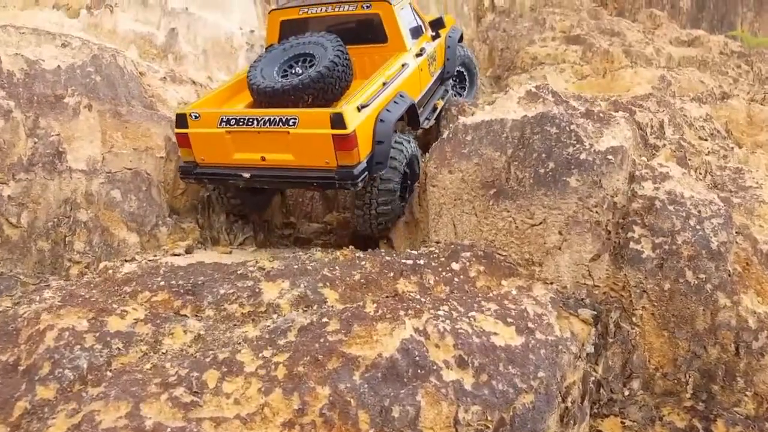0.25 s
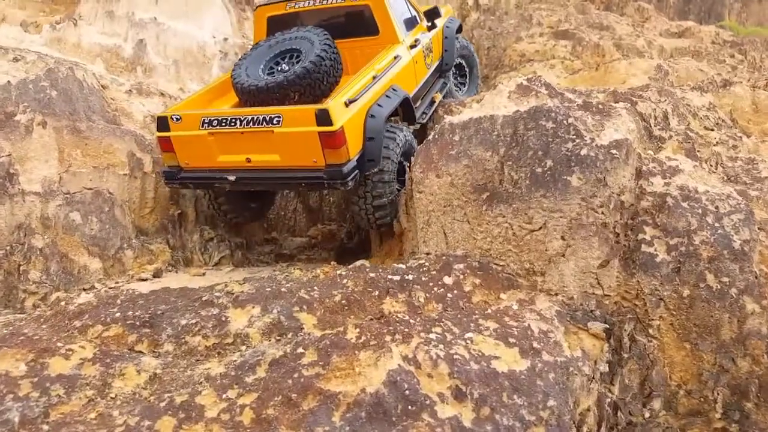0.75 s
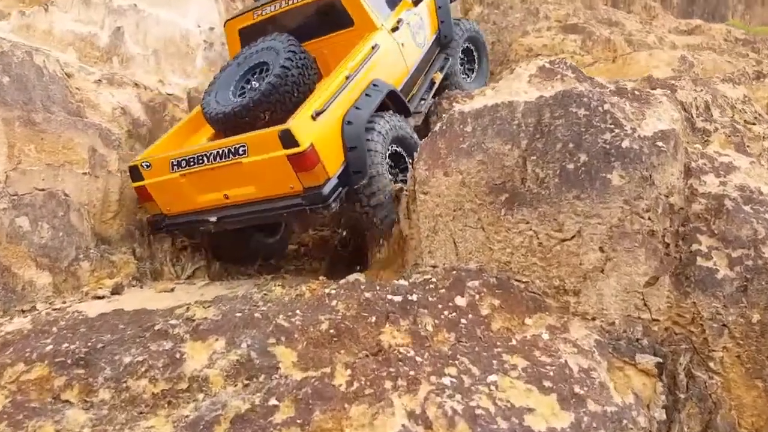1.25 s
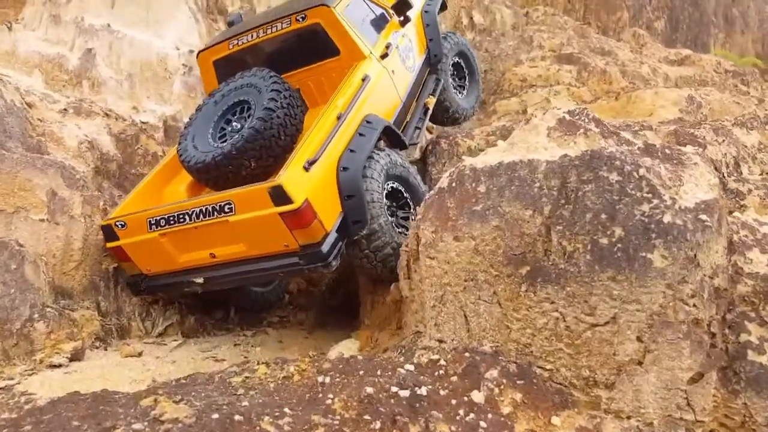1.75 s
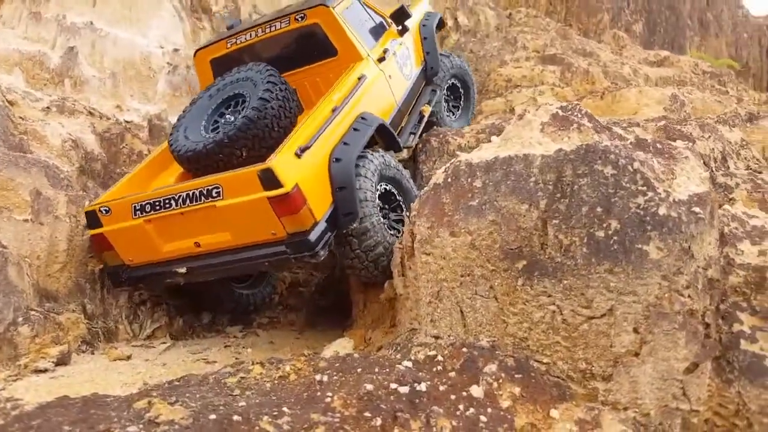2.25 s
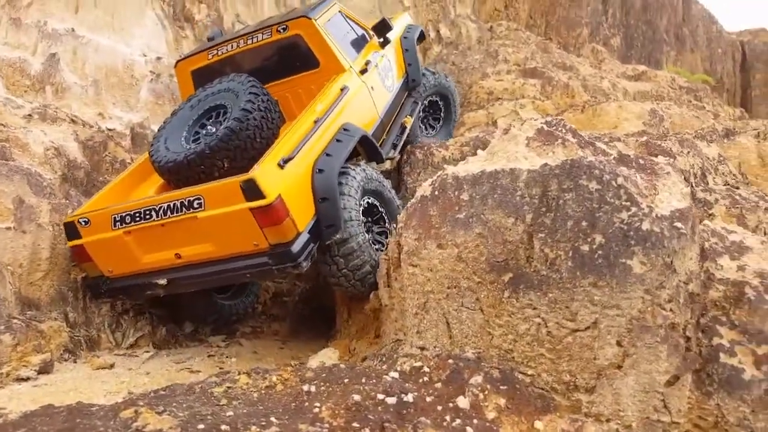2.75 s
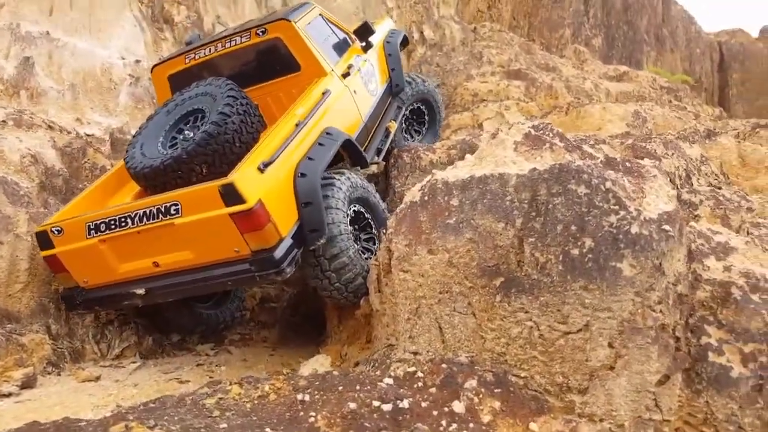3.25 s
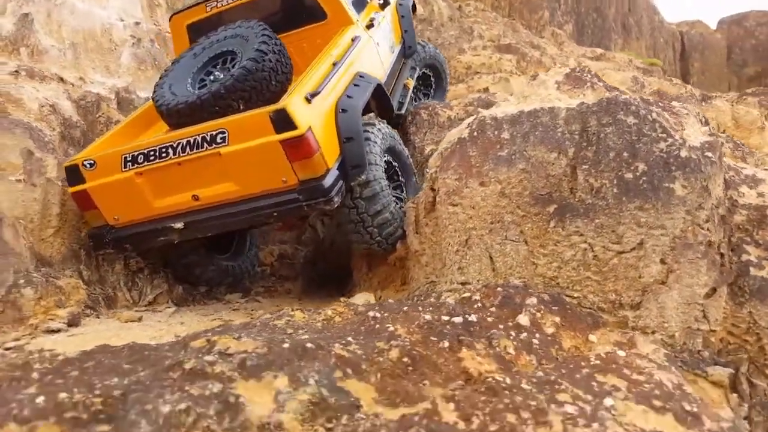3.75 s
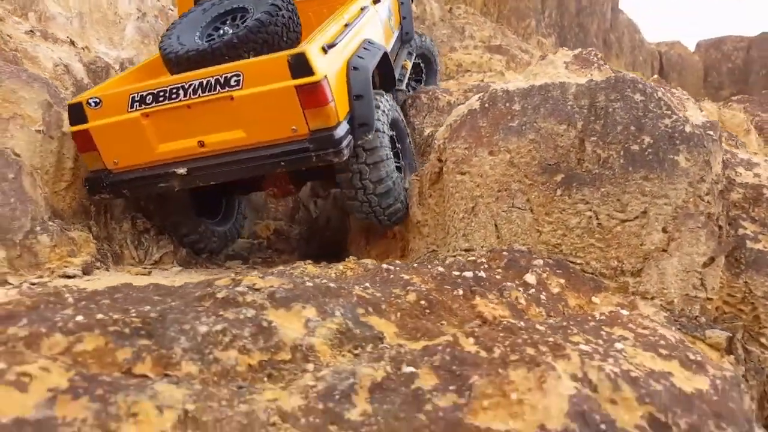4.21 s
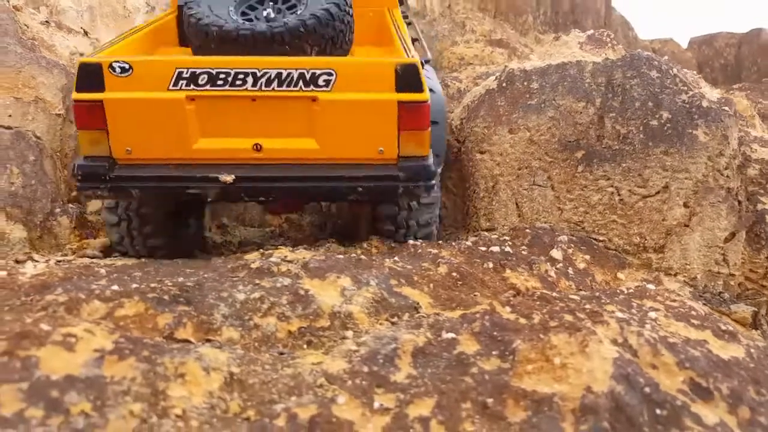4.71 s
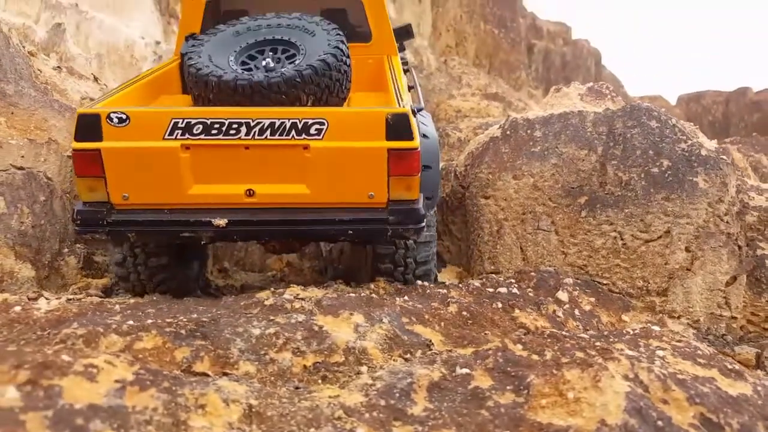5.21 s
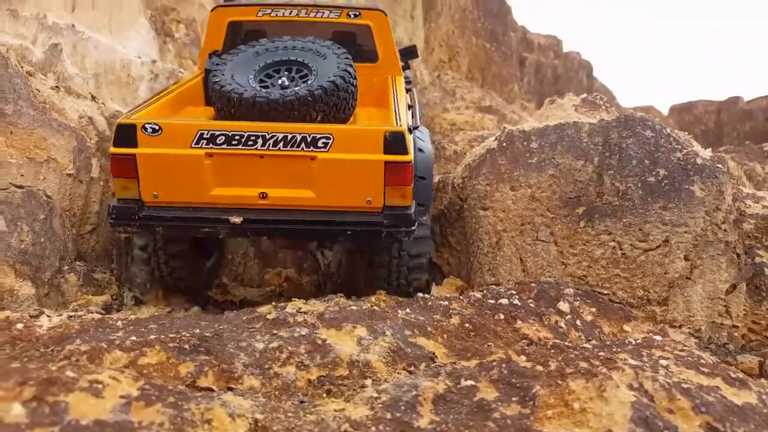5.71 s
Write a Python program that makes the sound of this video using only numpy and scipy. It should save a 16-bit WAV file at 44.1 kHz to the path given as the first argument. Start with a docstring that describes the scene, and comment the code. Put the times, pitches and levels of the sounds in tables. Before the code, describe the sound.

A toy-scale electric crawler grinds and clatters in uneven throttle bursts on rock, with faint high whistle, grit crackle and low outdoor rumble.

```python
"""Hard, gritty bursts of rattle: a small electric model truck claws at a rock step close to two microphones.
Gear teeth and tyre lugs knock on plastic chassis, gearbox and hollow shell, heard as noisy taps through
resonances; the speed controller whistles in the windings as a tone with side tones at the shaft rate.
Swarms of grains hiss and snap under the tyres, a lug squeaks in overtones, the servo buzzes in harmonics.
Further off, a wavering engine tone hums over the open-air rumble; the rock face answers in short noise."""
import sys
import numpy as np
from scipy import signal
from scipy.fft import rfft, irfft, next_fast_len
from scipy.io import wavfile
from scipy.ndimage import uniform_filter1d, map_coordinates

SR = 44100
rng = np.random.default_rng(int(sys.argv[2]) if len(sys.argv) > 2 else 0)


def store_pcm(level_fs):
    """Save levels as 16-bit WAV."""
    pcm = np.round(np.clip(level_fs, -1, 1) * 32767).astype(np.int16)
    wavfile.write(sys.argv[1], SR, np.atleast_2d(pcm).T)


N = 263277

# resonances of the hollow body shell: (centre [Hz], width [Hz], relative level [dB])
SHELL = [(176.5, 39, -11), (301.3, 30.6, 4), (435.3, 93, 0)]
# resonances of the plastic chassis: (centre [Hz], width [Hz], relative level [dB])
CHASSIS = [(646, 53, -7), (776.5, 60, -2.5), (857.7, 51.4, 3.5), (1098.5, 83, -2.5), (1292, 78, -3),
           (1445, 108, -9)]
# resonances of the gearbox: (centre [Hz], width [Hz], relative level [dB])
GEARBOX = [(1642, 109, 3), (1999, 138, 3), (2202, 133, 1), (2485, 260, -1.5), (2713, 285, -1.5),
           (3280, 930, -9.5), (4070, 1630, -13)]
REFERENCE_LOAD_DB = -32  # a hard pull; other settings are stated at this load


def amp(db):
    """Decibels to amplitude."""
    return 10 ** (np.asarray(db) / 20)


def unit(x):
    """x scaled to an rms of one."""
    return x / np.sqrt(np.mean(x ** 2) + 1e-20)


def along(points, hz):
    """Value at hz between (frequency [Hz], value) points on a log axis."""
    f, v = np.transpose(points)
    return np.interp(np.log(hz + 1), np.log(f + 1), v)


def curves(rows):
    """One value per sample for each column after the time."""
    s, *cols = np.transpose(rows)
    return [np.interp(np.arange(N) / SR, s, c) for c in cols]


def wobble(rate):
    """A smooth random curve, rate knots a second."""
    knots = rng.standard_normal(int(N * rate / SR) + 4)
    return map_coordinates(knots, [np.arange(N) * rate / SR])


def filtered(x, response):
    """x times a complex response of frequency."""
    m = next_fast_len(N + SR // 2)
    return irfft(rfft(x, m) * response(np.fft.rfftfreq(m, 1 / SR)), m)[..., :N]


def ring(x, modes):
    """x through a sum of resonances of alternating sign."""
    def response(f):
        total = 0
        for k, (centre, width, db) in enumerate(modes):
            mode = 1j * f * width / (centre * centre - f * f + 1j * f * width)
            total = total + (-1) ** k * amp(db) * mode
        return total
    return filtered(x, response)


def taps(per_s, spread_db):
    """Random impulses of uneven but bounded size."""
    struck = rng.random(N) < per_s / SR
    sign = rng.choice([-1, 1], N)
    return struck * sign * amp(spread_db * np.minimum(rng.exponential(size=N), 3))


def panned(x, db):
    """Left and right channels that differ by db, fixed or per sample."""
    return x * amp(np.array([db / 2, -db / 2]).reshape(2, -1))


def lagged(pair, s):
    """The right microphone hears s seconds later than the left."""
    return filtered(pair, lambda hz: np.exp(1j * np.pi * hz * s * np.array([[1], [-1]])))


def spans(rows, rise_db_per_s, fall_db_per_s, floor_db):
    """Level of the loudest row at each sample, ramps included, then that row's other columns."""
    t = np.arange(0, N / SR, 1 / 1000)
    start, end, open_db, close_db, *cols = np.transpose(rows)[..., None]
    held_db = open_db + (close_db - open_db) * np.clip((t - start) / (end - start), 0, 1)
    before, after = np.maximum(start - t, 0), np.maximum(t - end, 0)
    db = held_db - rise_db_per_s * before - fall_db_per_s * after
    lead = db.argmax(axis=0)
    level_db = np.maximum(db.max(axis=0), floor_db)
    return curves(np.transpose([t, level_db, *[c[lead, 0] for c in cols]]))


def throttle():
    """Drivetrain load and the shares of shell and gearbox, in dB; it grabs fast and coasts down slower."""
    # throttle bursts: (start [s], end [s], opening load [dB], closing load [dB],
    # shell share [dB], gearbox share at the reference load [dB])
    bursts = [(0, .06, -45, -54.5, 2.5, -6.5), (.085, .11, -56, -68, 3.5, 3),
              (.225, .3, -56.5, -53.5, -4, -4.5), (.33, .39, -50, -57.5, 0, -24.5),
              (.65, .69, -47, -42, -1.5, -13.5), (.69, .88, -39, -37, -5.5, -10.5),
              (.88, 1.085, -43, -45, -2, -10.5), (1.11, 1.125, -41, -50, -6, -11),
              (1.147, 1.235, -48, -38, -2, -9.5), (1.265, 1.38, -40, -43, -1.5, -11.5),
              (1.395, 1.6, -37, -32, -4, -9), (1.62, 1.65, -41, -46.5, 2, -10),
              (1.685, 1.745, -44, -42, 0.5, -13.5), (1.795, 1.88, -45, -47, -1, -12.5),
              (1.905, 2.1, -39, -36.5, -4.5, -12.5), (2.11, 2.14, -44.5, -43, -2, -14),
              (2.2, 2.35, -50, -62.5, 3, -8.5), (2.385, 2.41, -46, -47, -2, -10),
              (2.487, 2.6, -44.5, -45.5, -2.5, -8.5), (2.62, 2.77, -59, -58.5, -2.5, -4.5),
              (2.82, 3.23, -40.5, -41.5, -2, -11), (3.26, 3.285, -47.5, -55, -3.5, -16.5),
              (3.32, 3.34, -49, -56, -2.5, -14), (3.39, 3.44, -46.5, -48, -3.5, -33),
              (3.465, 3.55, -49, -50, -4.5, -18.5), (3.675, 3.69, -61, -59.5, -12.5, 3.5),
              (3.765, 3.81, -53, -51, 3, -14), (3.82, 3.845, -42, -32.5, -0.5, -10.5),
              (3.845, 3.89, -36, -38, -0.5, -12), (3.94, 4.22, -74, -67, 1, 3),
              (4.248, 4.27, -49, -61.5, 3, -12), (4.37, 4.46, -51.5, -46.5, 5.5, -11),
              (4.475, 4.61, -50, -45, 5, -7.5), (4.62, 4.66, -54, -64, 10.5, -10),
              (4.7, 4.73, -60, -64.5, 8, -1), (4.805, 4.9, -47.5, -38.5, 1, -7.5),
              (4.9, 5.0, -38, -32.5, -4.5, -7), (5.0, 5.045, -33.5, -36, -3.5, -5),
              (5.05, 5.085, -42, -48.5, 5, -5), (5.12, 5.135, -44.5, -48.5, 7, -10),
              (5.148, 5.175, -44.5, -49, 2.5, 1), (5.18, 5.4, -52.5, -73, 2, 0.5),
              (5.565, 5.6, -46.5, -44, 0, -2.5), (5.6, 5.87, -41, -35.5, -2, -8.5),
              (5.87, 5.97, -35.5, -27.5, -1, -5)]
    return spans(bursts, rise_db_per_s=1493, fall_db_per_s=510.5, floor_db=-93)


def load():
    """Load on the drivetrain in dB."""
    return throttle()[0]


def turns():
    """Shaft angle in radians; the speed follows the load, smoothed by inertia."""
    reference_hz, hz_per_db, creep_hz, inertia_s = 78, 2.6, 14, .08
    hz = np.maximum(reference_hz + hz_per_db * (load() - REFERENCE_LOAD_DB), creep_hz)
    smooth_hz = uniform_filter1d(hz, round(inertia_s * SR))
    return 2 * np.pi * np.cumsum(smooth_hz) / SR


def drivetrain():
    """Teeth and lugs tap three resonant bodies, harder once in each shaft turn."""
    load_db, shell_db, gear_db = throttle()
    gear_db = gear_db + 0.2 * (load_db - REFERENCE_LOAD_DB)  # its share grows with load
    tight_spot = np.cos(turns() + 0.6 * wobble(25))
    rattle_db = .7 * wobble(22) + 1.3 * wobble(70)  # the tread grips and lets go
    shared = unit(taps(per_s=1500, spread_db=2.0))  # taps that reach all three bodies

    def teeth(beat_db):
        mixed = shared + 1.3 * unit(taps(per_s=2000, spread_db=2.5))
        soft = filtered(mixed, lambda hz: 1 / (1 + 1j * hz / 3500) ** 2)  # plastic teeth meet softly
        return soft * amp(beat_db * tight_spot + 0.9 * wobble(40) + rattle_db)

    def tapped(x, modes, db):
        return ring(x * amp(db), modes) / np.std(ring(x, modes))

    chassis = tapped(teeth(2.0), CHASSIS, load_db)
    shell = tapped(teeth(1.37), SHELL, load_db + shell_db)
    gearbox = tapped(teeth(2.9), GEARBOX, load_db + gear_db)
    return chassis + shell + gearbox


def rock(x):
    """Short scattered answer of the rock face, weak in the bass; its scatter is redrawn every eighth of a second."""
    # decay of the answer: (frequency [Hz], time to fall 60 dB [s])
    decay = [(200, 0.046), (2000, 0.03), (10000, 0.015)]
    # colour of the answer: (frequency [Hz], level [dB])
    colour = [(300, -20), (1200, -9.5), (3000, 6.5)]
    out, step = np.zeros((2, N + 2 * SR)), SR // 8
    padded = np.pad(x, 2 * step)
    for start in range(-step, N, step):  # overlapping pieces, each with fresh scatter
        hz, t, z = signal.stft(rng.standard_normal((2, SR // 10)), SR, nperseg=128)
        tail_db = along(colour, hz)[:, None] - 60 * t / along(decay, hz)[:, None]
        tail = signal.istft(z * amp(tail_db), SR, nperseg=128)[1]
        piece = padded[start + 2 * step:][:2 * step] * np.hanning(2 * step)
        wet = signal.fftconvolve(piece[None], tail, axes=1)
        out[:, start + step:][:, :wet.shape[1]] += wet
    return out[:, step:N + step]


def grit():
    """Dense tiny grains crushed along the rock, a different swarm at each microphone."""
    # a wheel breaks loose or grit trickles:
    # (start [s], end [s], opening level [dB], closing level [dB], fizz share [dB])
    skids = [(0, .35, -66, -69, -6.5), (.8, .87, -68, -61, -7), (1.33, 1.44, -56, -57.5, -6.5),
             (1.44, 1.56, -44.5, -51, -4.5), (1.64, 1.9, -67, -62, -7), (2.26, 2.36, -60.5, -57, -3.5),
             (2.665, 2.77, -55.5, -57, -11), (3.95, 4.65, -66.5, -63, -7.5), (4.41, 4.44, -61, -59.5, -5),
             (4.97, 5.12, -53, -56.5, -8.5), (5.15, 5.2, -44, -54, -6), (5.91, 5.97, -50.5, -43.5, -13.5)]
    # spectrum of the scrub: (frequency [Hz], density [dB per Hz])
    scrub_spectrum = [(1470, -2), (2500, 0), (4530, -6), (4860, -6.5), (6810, -6.5), (9000, -8),
                      (11700, -84), (19800, -120)]
    # spectrum of the treble fizz: (frequency [Hz], density [dB per Hz])
    fizz_spectrum = [(5000, -40), (8500, -14), (9150, -13.5), (14000, -8), (15000, -18)]
    rest_db, rest_fizz_db = -69.5, -9  # loose grit when nothing slips; its fizz share
    roll_fizz_db = -13  # fizz share while rolling
    skid_db, skid_fizz_db = spans(skids, rise_db_per_s=352, fall_db_per_s=205, floor_db=-120)
    roll_db = -58 + 0.6 * (load() - REFERENCE_LOAD_DB)

    scrub = np.sqrt(amp(rest_db) ** 2 + amp(roll_db) ** 2 + amp(skid_db) ** 2)
    fizz = np.sqrt(amp(rest_db + rest_fizz_db) ** 2 + amp(roll_db + roll_fizz_db) ** 2
                   + amp(skid_db + skid_fizz_db) ** 2)
    grains = [unit(taps(per_s=2700, spread_db=6.5)) + 0.89 * rng.standard_normal(N) for _ in range(2)]
    swarm = np.array(grains) * amp(1.87 * wobble(33))

    def band(spectrum):
        return unit(filtered(swarm, lambda hz: amp(along(spectrum, hz))))

    return scrub * band(scrub_spectrum) + panned(fizz, 3) * band(fizz_spectrum)


def whistle():
    """The controller's switching tone, with blurred side tones one shaft rate away that grow with load."""
    # the controller holds or drives the motor:
    # (start [s], end [s], opening level [dB], closing level [dB])
    drives = [(0, .38, -68, -65), (.44, .7, -72, -64), (.7, 1.1, -63.5, -68), (1.17, 1.4, -73.5, -66),
              (1.4, 2.38, -68.5, -59.5), (3.2, 3.52, -77, -74), (3.8, 4.0, -63, -68.5),
              (4.1, 4.8, -62.5, -69.5), (4.85, 5.0, -65, -61), (5.41, 5.82, -69.5, -60.5),
              (5.88, 5.97, -66, -65)]
    switch_hz = 8033.7
    carrier = 2 * np.pi * switch_hz * np.arange(N) / SR + .2 * wobble(20)
    depth = amp(0.295 * (load() + 31) - 5.0 + 3.5 * wobble(12))
    spin = turns() + 1.2 * wobble(25)
    tone = np.sin(carrier) + depth * (np.sin(carrier + spin) + 0.13 * np.sin(carrier - spin))
    side_db = 5 + 2.5 * wobble(4)  # left over right
    level_db = spans(drives, rise_db_per_s=250, fall_db_per_s=150, floor_db=-90)[0]
    return panned(np.sqrt(2) * amp(level_db + 2.01 * wobble(30)) * tone, side_db)


def air():
    """Outdoor rumble as shaped noise, alike at both microphones in the bass only."""
    # spectrum of the open air: (frequency [Hz], density [dB per Hz])
    spectrum = [(12, -47), (25, -22.5), (45, 0), (75, 3), (140, -3), (220, -13), (900, -14), (2000, -19),
                (3400, -30), (7000, -50), (14500, -34)]
    # likeness of left and right: (frequency [Hz], correlation [0 to 1])
    alike = [(60, 0.963), (290, 0.874), (1400, 0.15), (3000, 0)]

    def spread(hz):
        turn = np.arccos(np.clip(along(alike, hz), -1, 1)) / 2
        return amp(along(spectrum, hz)) * [np.cos(turn), np.sin(turn)]

    mid, side = filtered(rng.standard_normal((2, N)), spread)
    level = amp(-59.5 + 0.12 * wobble(3.4))
    return panned(level, 1) * unit(np.array([mid + side, mid - side]))


def hum():
    """A far engine note: one low tone, wavering in level and phase."""
    # far engine: (time [s], level [dB])
    swell = [(0, -80), (1.9, -62.5), (3.55, -89), (3.75, -56.5), (5.25, -61.5), (5.5, -75), (5.97, -57)]
    level = amp(curves(swell)[0] + 1.7 * wobble(14))
    return level * np.sin(2 * np.pi * 112 * np.arange(N) / SR + 0.61 * wobble(13))


def servo():
    """The steering servo hunts: a fuzzy harmonic buzz that stutters some fifty times a second."""
    # steering effort: (time [s], level [dB])
    effort = [(0, -102), (.2, -67.5), (.65, -71), (1.2, -84), (2.4, -87.5), (3.7, -99), (3.95, -65.5),
              (4.3, -66.5), (4.7, -65), (5.3, -60), (5.4, -84), (5.97, -85)]
    # harmonics of the buzz: (multiple of the pitch, relative level [dB])
    orders = [(1, -8), (2, -5), (3, -3), (5, 0), (6, -12)]
    pitch_hz, stutter_hz = 310.2, 48
    t = np.arange(N) / SR
    phase = 2 * np.pi * pitch_hz * t + .4 * wobble(70)
    stutter = amp(3.5 * np.sin(2 * np.pi * stutter_hz * t + 1.5 * wobble(12)))
    buzz = sum(amp(db + 2.5 * wobble(50)) * np.sin(k * phase) for k, db in orders)
    return amp(curves(effort)[0]) * unit(stutter * buzz)


def knocks():
    """Driveline slack taken up: a short blow at its own pitch into chassis and gearbox, a click into the shell."""
    # blows: (time [s], level before the bodies ring [dB], shell share [dB], pitch [Hz])
    blows = [(0.333, -39, -23, 848), (0.647, -28.5, -1, 850), (0.815, -13, 2.5, 800),
             (1.148, -23, -26, 830), (1.208, -15.5, -26, 865), (1.265, -30, 9, 853), (1.691, -31, -3, 858),
             (1.744, -25, -2, 776), (1.796, -16.5, -22, 1307), (1.912, -23, 2, 879), (2.02, -31, 1, 886),
             (2.137, -17, -2, 1050), (2.17, -28, -19, 934), (2.221, -13, -35, 1090), (2.489, -28, -7, 895),
             (2.519, -20, -9, 895), (2.845, -28, 14.5, 790), (2.954, -16, -6, 851), (3.227, -22, -20, 853),
             (3.325, -33, -42, 895), (3.39, -28, -16, 850), (3.468, -34.5, -25.5, 906),
             (3.514, -29, -34.5, 875), (3.683, -37.5, 1.5, 756), (4.074, -46.5, 15, 904),
             (4.251, -33, 3, 1090), (4.71, -38.5, 15, 1260), (4.804, -25, 4.5, 910),
             (5.121, -35, 17.5, 1294), (5.149, -32, -8, 1120), (5.314, -30.5, 4, 730),
             (5.563, -27.5, -16.5, 795)]
    upper, lower = np.zeros((2, N))  # into chassis and gearbox; into the shell
    t = np.arange(SR // 50) / SR
    for s, db, shell_db, hz in blows:
        rough = 0.77 + 0.039 * rng.standard_normal(len(t))
        blow = amp(-60 * t / 0.0095) * rough * np.sin(2 * np.pi * hz * t)
        at = round(s * SR)
        upper[at:][:len(t)] += amp(db) * blow
        lower[at:][:len(t)] += amp(db + shell_db - 60 * t / 0.0023)
    return 0.2 * upper + ring(upper, CHASSIS) + amp(-6.0) * ring(upper, GEARBOX) + ring(lower, SHELL)


def snaps():
    """Grains snap and drop: each cracks for a few milliseconds, in a low and a high band."""
    # grains: (time [s], level before the bands [dB], treble share [dB], left over right [dB])
    grains = [(0.9532, -53, -8, 1.0), (1.447, -49, -1.5, 10.5), (1.5398, -43, -15, 29),
              (1.56, -30.5, 20.5, 13), (1.5664, -44, -2, -15), (1.6891, -56, -16, 4), (1.869, -53, -22, 2),
              (2.172, -51, -26, 10), (2.2503, -60, -15, -2), (3.277, -58, -27, -8.5),
              (3.928, -45, -20, 9.5), (4.0471, -53, -1, 15), (4.0512, -47, -4.5, 6),
              (4.0635, -46.5, -16, -0.5), (4.1245, -43, -11.5, 10), (4.4244, -54, -4, 14),
              (4.4817, -50.5, -20, -7.5), (5.0854, -59.5, -2.5, -1.5), (5.0995, -49.5, -5, 7),
              (5.52, -53.5, 10, 6)]
    low, high = np.zeros((2, N + SR)), np.zeros((2, N + SR))
    t = np.arange(SR // 40) / SR
    for s, db, treble_db, side_db in grains:
        crack = panned(amp(db - 60 * t / 0.0096) * rng.standard_normal(len(t)), side_db)
        at = round(s * SR)
        low[:, at:][:, :len(t)] += amp(8.0) * crack
        high[:, at:][:, :len(t)] += amp(treble_db) * crack
    low_band = ring(low[:, :N], [(1900, 920, 0), (4740, 5500, -0.5)])
    high_band = ring(ring(high[:, :N], [(11960, 1700, 0)]), [(11500, 31000, 0)])
    return low_band + high_band


def squeak():
    """A rubber lug slips on the rock: rough upper overtones of a short arched chirp."""
    # rubber slip: (time [s], fundamental [Hz], level of the fourth harmonic before its flutter [dB])
    slip = [(2.68, 1540, -77), (2.7, 1657, -64), (2.715, 1716, -65), (2.73, 1670, -62), (2.745, 1540, -67)]
    hz, db = curves(slip)
    phase = 2 * np.pi * np.cumsum(hz) / SR + .3 * wobble(400)
    gate = (np.arange(N) > slip[0][0] * SR) & (np.arange(N) < slip[-1][0] * SR)
    overtones = sum(a * np.sin(k * phase) for k, a in [(3, 0.44), (4, 1), (5, 0.88), (6, 0.92)])
    return gate * amp(db + 1.8 * wobble(200)) * overtones


def scene():
    """The truck close by with the rock's answer, its small noises, and the far hum and air around."""
    # where the truck stands before the microphones: (time [s], left over right [dB])
    side_of_truck = [(0.0, 2.5), (2.43, 4.5), (3.94, 4), (4.92, 3), (5.97, 3)]
    truck = drivetrain() + knocks() + servo()
    near = lagged(panned(truck, curves(side_of_truck)[0]), .00008) + amp(-20.5) * rock(truck)
    small = lagged(snaps() + whistle(), 0.000221) + grit() + squeak()
    return near + small + panned(hum(), 1) + air()


def record(dry):
    """The microphones' treble closes early, and nothing passes the band limit."""
    # treble response: (frequency [Hz], level [dB])
    treble = [(14500, 0), (14900, -28), (15300, -42)]
    top_hz = 16026
    return filtered(dry, lambda hz: amp(along(treble, hz)) * (hz < top_hz))


dry = scene()
out = record(dry)
store_pcm(out)
```